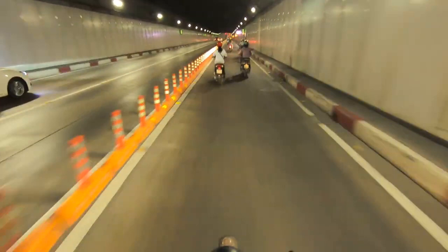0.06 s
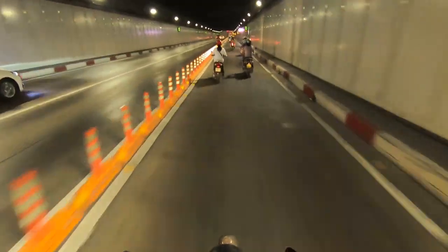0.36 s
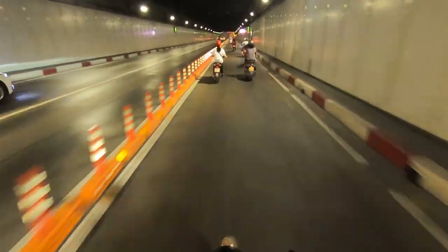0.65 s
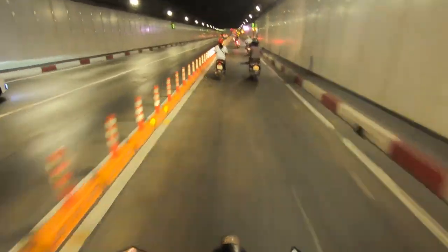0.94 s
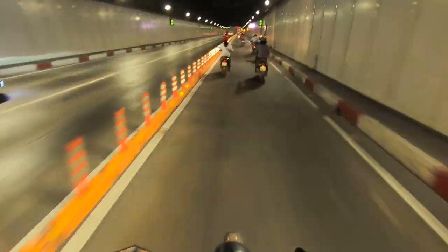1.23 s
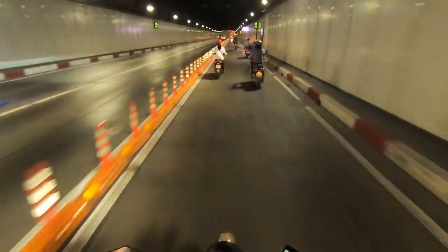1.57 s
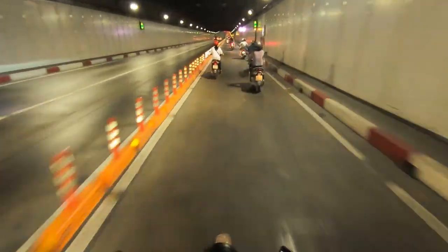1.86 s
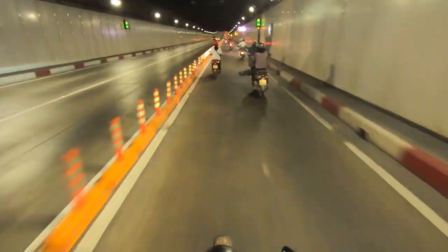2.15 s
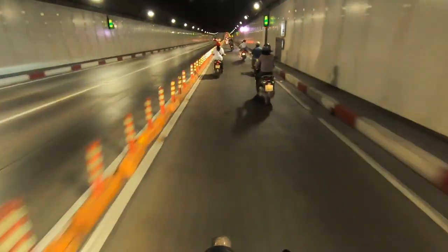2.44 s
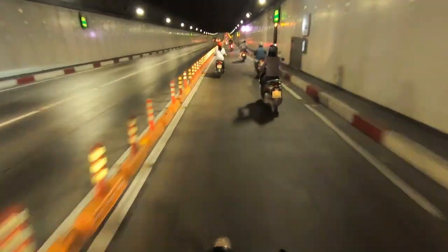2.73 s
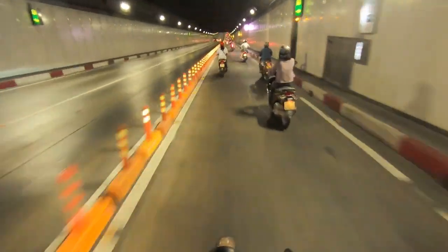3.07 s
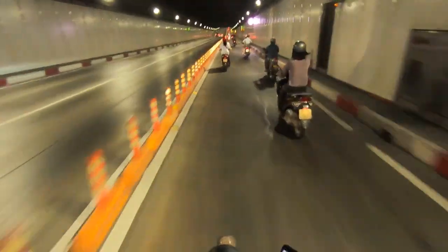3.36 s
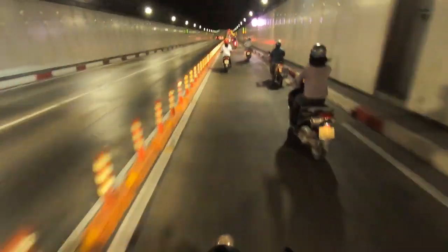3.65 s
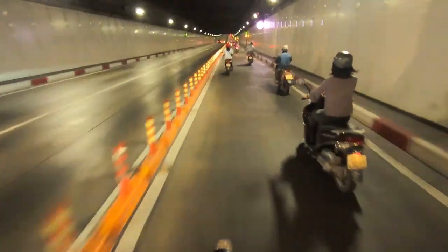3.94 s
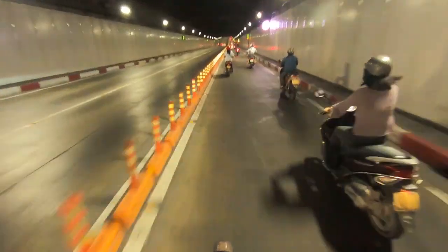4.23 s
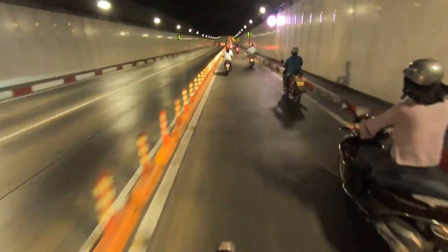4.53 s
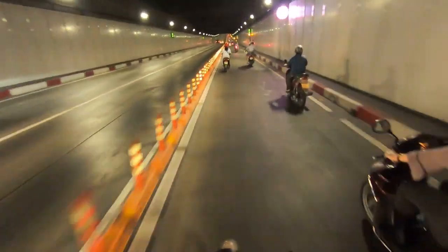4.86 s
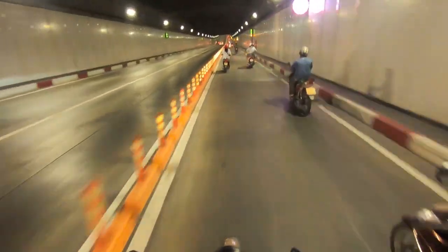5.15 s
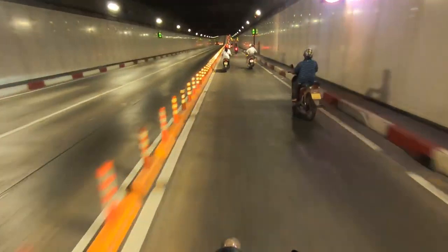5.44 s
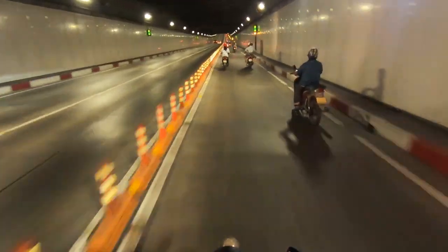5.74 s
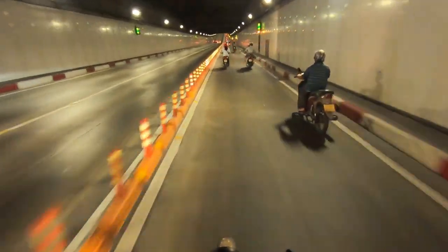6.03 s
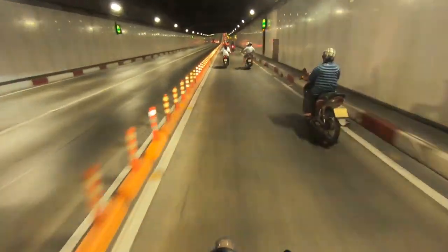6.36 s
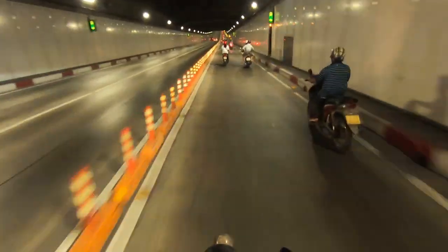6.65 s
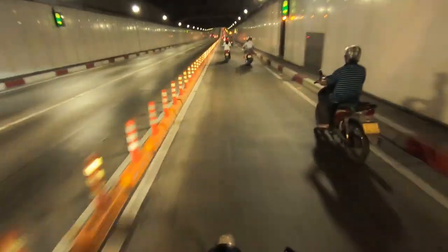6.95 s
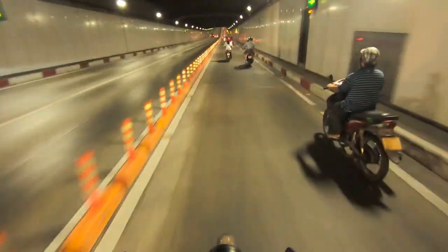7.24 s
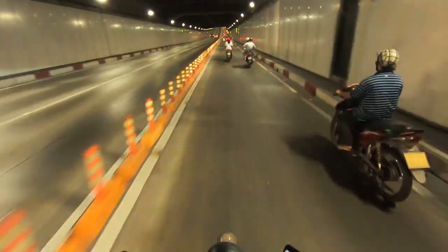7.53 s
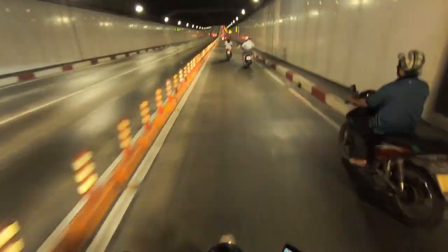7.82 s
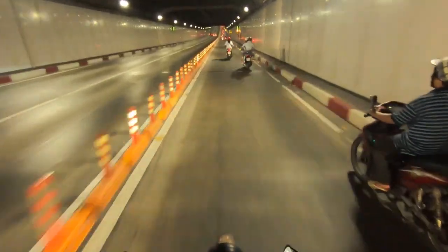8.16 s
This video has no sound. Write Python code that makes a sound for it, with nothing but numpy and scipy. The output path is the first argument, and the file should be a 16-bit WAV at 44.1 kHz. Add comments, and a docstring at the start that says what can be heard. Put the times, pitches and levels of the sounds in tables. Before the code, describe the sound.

Heard from the seat, a single-cylinder motorbike cruises with a low, swelling drone, amid wind rumble and a reverberant tunnel traffic roar.

```python
"""A booming exhaust drone, close up: a small single-cylinder motorbike in a road tunnel, from the seat.
Each firing sends a puff down the pipe; its low orders swell and fade between the walls, and the crank
thrums when the throttle eases. Wind buffets the microphone, gears whine and the brake faintly squeaks.
Brief rough drones come and go, and a scooter's belt whines close past as the bike overtakes it.
Farther off, the traffic's engines and tyres blend into a reverberant roar."""
import sys
import numpy as np
from scipy import signal
from scipy.fft import rfft, irfft, next_fast_len
from scipy.io import wavfile
from scipy.ndimage import uniform_filter1d, minimum_filter1d, map_coordinates

SR = 44100
rng = np.random.default_rng(int(sys.argv[2]) if len(sys.argv) > 2 else 0)


def int16_out(signal):
    """Quantize to a 16-bit WAV file."""
    q = np.round(np.clip(np.atleast_2d(signal).T, -1, 1) * 32767)
    wavfile.write(sys.argv[1], SR, q.astype(np.int16))


N = 361179

# the bike's engine speed: (time [s], firing rate [Hz])
ENGINE_SPEED = [(0, 38.4), (.6, 37.4), (1.21, 37.0), (1.39, 39.8), (1.56, 36.6), (1.72, 38.3), (1.92, 37.2),
                (2.07, 38.5), (2.37, 38.1), (3.04, 38.5), (3.18, 35.7), (3.31, 38.8), (3.47, 37.8),
                (4.4, 37.1), (4.76, 36.5), (4.97, 38.3), (5.18, 36.6), (5.45, 37.3), (7.5, 38.5),
                (8.19, 38.8)]
# the boom, the exhaust's strongest order, at the seat: (time [s], level [dB])
BOOM_LEVEL = [(0, -11.5), (1.15, -15), (1.5, -22.5), (1.75, -15), (1.97, -17.5), (2.1, -12), (2.6, -13.5),
              (2.8, -18.5), (3.03, -18), (3.12, -14.5), (4.73, -12.5), (4.82, -21.5), (5.4, -15.5),
              (6.0, -19), (6.45, -19.5), (6.9, -17), (7.5, -16), (7.7, -20), (8.19, -18)]
# just above the boom, off resonance: (order [x firing rate], level [dB], change with the boom [dB/dB])
UPPER_ORDERS = [(5, -21.5, -0.25), (6, -27.5, 0.5), (7, -35, -1.5)]
# a resonance that shifts as the bike moves between the walls: (time [s], centre [Hz], level [dB])
WALL_RESONANCE = [(0, 228, -24), (.8, 228, -20), (1.1, 201.5, -16.5), (1.45, 230, -15), (1.57, 195, -15),
                  (1.7, 242, -20), (2.45, 225, -17.5), (2.7, 251, -25), (3.03, 254, -22),
                  (3.15, 199, -20.5), (4.4, 183.4, -22.5), (5.75, 181, -18), (6.05, 267, -23),
                  (6.6, 250, -18), (7.35, 256.6, -13.5), (7.72, 251.3, -17.5), (8.19, 252.6, -16)]
# the throttle eases and the crank thrums: (time [s], level [dB], half length [s])
THRUMS = [(4.848, -18.5, 0.058), (5.07, -23.5, 0.046), (6.116, -28, .1), (7.65, -31, 0.1)]
# the weaker exhaust orders: (order [x firing rate], level [dB])
OVERTONES = [(1, -48.5), (3, -33), (8, -34.5), (9, -37), (10, -43), (11, -42), (12, -47), (13, -45.5)]
# rough gas noise from the pipe: (frequency [Hz], relative level [dB])
CHUFF_SPECTRUM = [(60, -31), (110, -13.5), (160, 2), (230, 0), (300, -6), (350, -16.5), (600, -41),
                  (2000, -89.5)]

def exhaust(firing_hz, cycles, boom_order=4, pipe_bend=.95, resonance_width_hz=28.7):
    """Just below the seat, each firing puffs down the pipe: booming orders, overtones, a rough chuff."""
    phase = 2 * np.pi * cycles
    strength = amp(1.2 * wobble(30))  # no two firings are alike
    boom_db, = curves(BOOM_LEVEL)
    resonance_hz, resonance_db = curves(WALL_RESONANCE)
    swing_db = boom_db - boom_db.mean()
    gains = {boom_order: amp(boom_db)}
    for order, db, follows in UPPER_ORDERS:
        detuning = (round(order) * firing_hz - resonance_hz) / resonance_width_hz
        lift = amp(resonance_db) * np.exp(-detuning ** 2)  # the resonance lifts the order it meets
        gains[round(order)] = np.hypot(amp(db + follows * swing_db), lift) * amp(1.65 * wobble(7))
    boom = np.zeros(N)
    for order, gain in gains.items():
        lag = pipe_bend * (order - boom_order) ** 2  # the pipe delays higher orders, spreading a puff
        drift = 0.45 * wobble(2.5)  # the paths by way of the walls keep changing
        boom += gain * fuzzy_tone(order * phase - lag + drift, spread=0.13, rate=16)
    thrum = (amp(-35) + swells(THRUMS)) * fuzzy_tone(2 * phase, spread=0.16, rate=16)
    overtones = sum(amp(db) * fuzzy_tone(round(order) * phase, spread=0.9, rate=10)
                    for order, db in OVERTONES)
    puffs = (1 + 0.59 * np.cos(phase)) * rng.standard_normal(N)
    chuff = amp(-22.5 - 0.33 * swing_db) * coloured(puffs, CHUFF_SPECTRUM)  # rougher as the boom fades
    return strength * boom + thrum + overtones + chuff


def clatter(cycles):
    """Under the rider, the valve gear rasps once a crank turn, twice per firing; the tunnel smears it."""
    gate = np.exp(-4 * (2 * cycles % 1))
    rasp = coloured(gate * rng.standard_normal(N), TYRE_SPECTRUM)  # in the same band as the tyres
    return amp(-41.5) * rasp + amp(-43.5) * tunnel(rasp)


# gusts on the microphone: (time [s], level [dB], half length [s])
GUSTS = [(.77, -24.5, 0.18), (1.4, -34, .2), (2.85, -32, 0.24), (4.806, -30, 0.15), (6.004, -33, .45)]
# the rumble of the eddies: (frequency [Hz], relative level [dB])
BUFFET_SPECTRUM = [(10, -11.5), (25, -7.5), (45, -2.5), (75, -1.5), (110, 0.5), (200, -13.5), (500, -34),
                   (1500, -88.5)]

def wind(steady_db=-27.5):
    """Eddies hit the microphone itself in low lumps, harder in the gusts."""
    force = amp(steady_db) + swells(GUSTS)
    lumps = amp(1.3 * wobble(16))
    return force * unit(lumps * rush(BUFFET_SPECTRUM, patchy_db=0.5))


# steady gear whine, partials 1 to 4: (level [dB])
GEAR_PARTIALS = [-42, -43.5, -43.5, -44]
# single partials flare up: (time [s], partial [number], level [dB], half length [s])
GEAR_FLARES = [(1.7, 1, -24, 0.33), (1.9, 2, -36, 0.45), (0.97, 3, -38.5, 1.3), (4.3, 2, -32, 0.29),
               (4.3, 4, -47.5, .3)]

def gears(mesh_hz=287):
    """Behind the seat, the final-drive gears whine at a pitch set by road speed, blurred by echoes."""
    phase = 2 * np.pi * np.cumsum(mesh_hz * (1 + .002 * wobble(2))) / SR
    whine = np.zeros(N)
    for k, steady_db in enumerate(GEAR_PARTIALS, 1):
        flares = sum(swell(s, db, half_s) for s, partial, db, half_s in GEAR_FLARES if round(partial) == k)
        whine += (amp(steady_db) + flares) * fuzzy_tone(k * phase, spread=1.2, rate=30)
    return whine


# brief drones: those near 300 Hz fall where the exhaust's boom fades, the rest are scooters' engines
# (time [s], pitch [Hz], level [dB], half length [s])
BRIEF_DRONES = [(0.597, 415.4, -31, .35), (1.899, 463.7, -27.5, 0.35), (2.934, 305, -25, 0.19),
                (3.604, 113.4, -24.5, 0.64), (4.62, 110.7, -23, 0.3), (5.083, 485.4, -30, .13),
                (5.104, 299.5, -24, 0.061), (5.698, 450, -34.5, 0.45), (8.08, 319.6, -24, .12)]

def drones(blur=.18):
    """Brief rough drones swell and fade around the bike, blurred by the tunnel in proportion to pitch."""
    t = np.arange(N) / SR
    return sum(swell(s, db, half_s) * fuzzy_tone(2 * np.pi * hz * t, spread=1.8, rate=blur * hz)
               for s, hz, db, half_s in BRIEF_DRONES)


def belt(pitch_hz=2510, abeam_s=4.87, side_m=1.2, overtake_m_per_s=4, sound_m_per_s=343):
    """An overtaken scooter's belt whines close past the microphone with a slight Doppler fall."""
    t = np.arange(N) / SR
    ahead_m = overtake_m_per_s * (abeam_s - t)
    distance_m = np.hypot(ahead_m, side_m)
    nearness = side_m / distance_m
    shield = amp(-12.5 * nearness ** 2)  # the scooter's body hides the belt when abeam
    emitted_s = t - distance_m / sound_m_per_s
    whine = fuzzy_tone(2 * np.pi * pitch_hz * emitted_s, spread=2.5, rate=70)
    return amp(-39.5) * nearness * shield * whine


# faint squeaks of the brake disc: (time [s], level [dB], half length [s])
SQUEAKS = [(1.104, -72, .025), (3.78, -79, .05), (4.1, -84, 0.24), (6.25, -81.5, .06), (6.49, -73, .04),
           (6.88, -74, .015), (7.152, -69, .01), (7.982, -66, .015), (8.03, -76, .09)]

def brake(modes_hz=(10897, 13100)):
    """Down at the wheel, the pad grazes the disc, whose two modes chatter faintly and at times flare."""
    t = np.arange(N) / SR
    touch = (amp(-89.5) + swells(SQUEAKS)) * amp(4 * wobble(25))
    lower, upper = (fuzzy_tone(2 * np.pi * hz * t, spread=1.5, rate=90) for hz in modes_hz)
    return touch * (lower + amp(-10.5) * upper)


# overall gain of the traffic's roar: (time [s], level [dB])
ROAR_LEVEL = [(0, -34.5), (2.1, -33), (2.7, -33.5), (3.22, -32.5), (3.75, -36), (4.5, -34), (4.75, -36.5),
              (5.3, -33), (6.1, -31), (6.8, -31.4), (7.08, -32.3), (7.14, -33.5), (8.19, -32)]
# tread rush and hiss against the roar: (time [s], relative level [dB])
TREBLE_LEVEL = [(0, -0.5), (2.9, 0.6), (3.22, 1.2), (3.7, 2), (4.5, -0.05), (6.9, -0.5), (7.15, -1.2),
                (8.19, -1)]
# the four bands of the roar, low to high: (frequency [Hz], relative level [dB])
ENGINE_SPECTRUM = [(150, -27.5), (300, 2.5), (420, -1), (500, -0.5), (600, -1.5), (750, -22), (1200, -33.5),
                   (4000, -80)]
TYRE_SPECTRUM = [(300, -22), (620, -3), (850, 1.5), (1080, -1.5), (1300, -8.5), (1800, -12.5),
                 (4000, -63.5)]
TREAD_SPECTRUM = [(700, -24.5), (1200, -2.5), (1450, -0.5), (1750, -2.5), (2200, -5.5), (2800, -8),
                  (3500, -15), (4500, -21.5), (5100, -29), (5800, -44.5), (8000, -82.5)]
HISS_SPECTRUM = [(3000, -14.5), (5500, 2), (6600, 0.5), (8200, 1.5), (9800, -7.5), (11000, -7.5),
                 (11900, -11.5), (13000, -13.5), (14500, -20.5), (16000, -28.5)]

def traffic(hiss_rise_db=6, hiss_rise_s=4.9):
    """Engines and tyres farther down the tunnel blend into one roar with a thin hiss on top."""
    engines = amp(3 + 0.35 * wobble(4)) * rush(ENGINE_SPECTRUM, patchy_db=-0.5)
    tyres = amp(4.5 + 0.19 * wobble(10)) * rush(TYRE_SPECTRUM, patchy_db=0.3)
    tread = amp(0.23 * wobble(8.4)) * rush(TREAD_SPECTRUM, patchy_db=0.66)
    rise = np.minimum(1, np.arange(N) / SR / hiss_rise_s)  # the hiss grows, then holds
    hiss = amp(-35.5 + hiss_rise_db * rise) * rush(HISS_SPECTRUM, patchy_db=1.9)
    roar_db, = curves(ROAR_LEVEL)
    treble_db, = curves(TREBLE_LEVEL)
    return amp(roar_db + 0.32 * wobble(8)) * (engines + tyres + amp(treble_db) * (tread + hiss))


# the tunnel's reverberation: (frequency [Hz], time to fall 60 dB [s])
TUNNEL_DECAY = [(100, 1.6), (500, 3.3), (2000, 0.66), (10000, 0.57)]

def tunnel(x):
    """The long echo off the concrete all around; the treble dies first."""
    hz, t, noise = signal.stft(rng.standard_normal(2 * SR), SR, nperseg=256)
    decay = amp(-60 * t / along(TUNNEL_DECAY, hz)[:, None])
    tail = signal.istft(noise * decay, SR, nperseg=256)[1]
    return signal.fftconvolve(x, tail / np.linalg.norm(tail))[:N]


def fuzzy_tone(phase, spread, rate):
    """A tone of rms 1 whose many wall reflections make it flutter in level and phase."""
    paths = 1 + spread * (wobble(rate) + 1j * wobble(rate))
    return unit(np.real(paths * np.exp(1j * phase)))


def rush(spectrum, patchy_db):
    """Noise of rms 1 with drifting patches of random gain."""
    cells = signal.stft(rng.standard_normal(N), nperseg=1024)[2]
    patches = uniform_filter1d(rng.standard_normal(cells.shape), size=4, axis=0)  # across frequency
    patches = uniform_filter1d(patches, size=12, axis=1)  # across time
    noise = signal.istft(cells * amp(patchy_db * unit(patches)), nperseg=1024)[1][:N]
    return coloured(noise, spectrum)


def coloured(x, spectrum):
    """x shaped by a spectrum, at rms 1."""
    return unit(filtered(x, lambda hz: amp(along(spectrum, hz))))


def filtered(x, response):
    """x through a gain that depends on frequency."""
    size = next_fast_len(N + SR // 2)
    hz = np.fft.rfftfreq(size, 1 / SR)
    return irfft(rfft(x, size) * response(hz), size)[:N]


def swell(s, db, half_s):
    """A gain that rises to db at time s and falls again."""
    return amp(db) * np.exp(-((np.arange(N) / SR - s) / half_s) ** 2)


def swells(rows):
    """The summed gain of one swell per row."""
    return sum(swell(*row) for row in rows)


def wobble(rate):
    """A smooth random curve, rate knots a second."""
    knots = rng.standard_normal(int(N * rate / SR) + 4)
    return map_coordinates(knots, [np.arange(N) * rate / SR])


def curves(rows):
    """One value per sample for each column after the time."""
    times, *columns = np.transpose(rows)
    return [np.interp(np.arange(N) / SR, times, column) for column in columns]


def along(points, hz):
    """(frequency, value) points interpolated on a log axis."""
    frequencies, values = np.transpose(points)
    return np.interp(np.log(hz + 1), np.log(frequencies + 1), values)


def amp(db):
    """Decibels to gain."""
    return 10 ** (np.asarray(db) / 20)


def unit(x):
    """x scaled to rms 1."""
    return x / np.sqrt(np.mean(x ** 2) + 1e-20)


def scene():
    """All sources at one microphone on the rider's seat."""
    firing_hz, = curves(ENGINE_SPEED)
    cycles = np.cumsum(firing_hz) / SR
    engine = exhaust(firing_hz, cycles) + clatter(cycles)
    return (engine + wind() + traffic() + gears() + drones() + belt() + brake())[None]


def record(dry):
    """The camera's limiter holds the peaks down; nothing is kept above its band limit."""
    ceiling, window_samples, top_hz = .74, 1323, 15700
    needed = np.minimum(1, ceiling / (np.abs(dry[0]) + 1e-9))
    gain = uniform_filter1d(minimum_filter1d(needed, size=window_samples), size=window_samples)
    soft_ends = signal.windows.tukey(N, .0006)
    return filtered(dry[0] * gain * soft_ends, lambda hz: hz < top_hz)[None]


dry = scene()
out = record(dry)
int16_out(out)
```